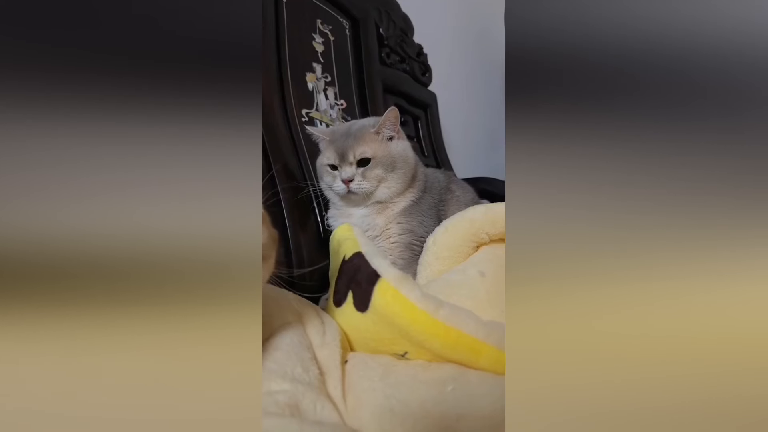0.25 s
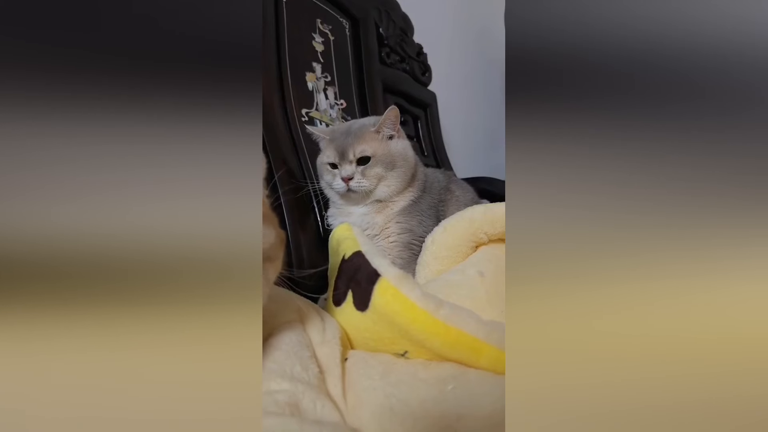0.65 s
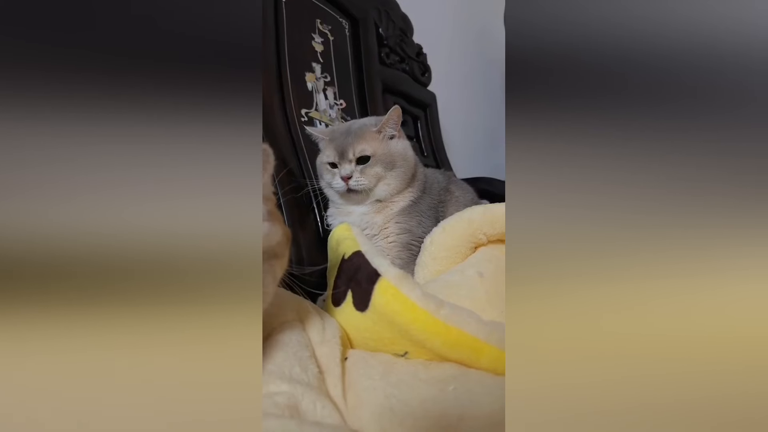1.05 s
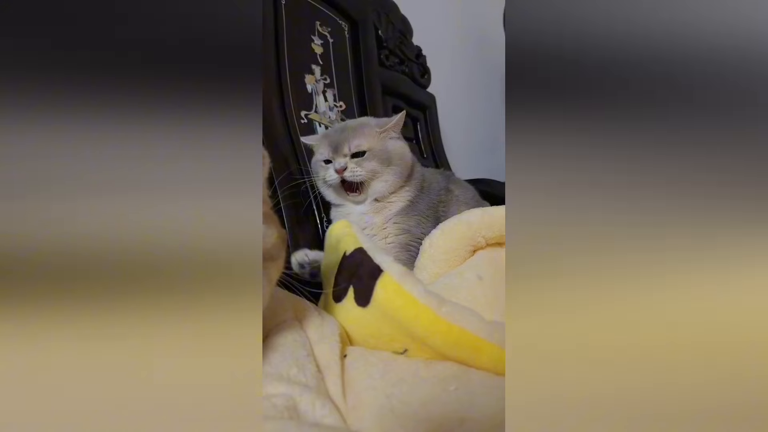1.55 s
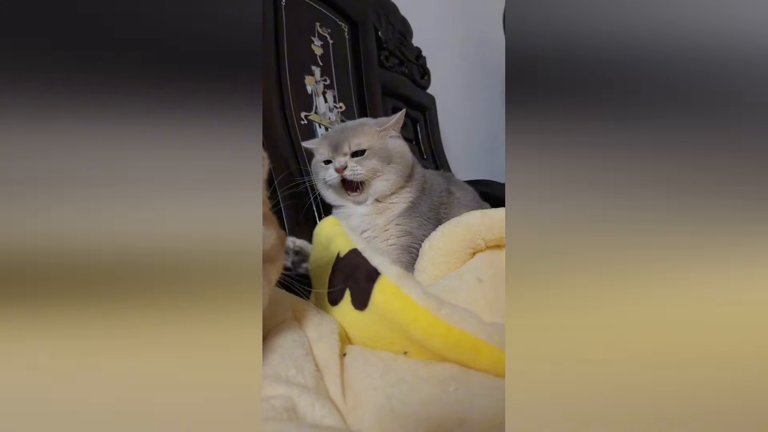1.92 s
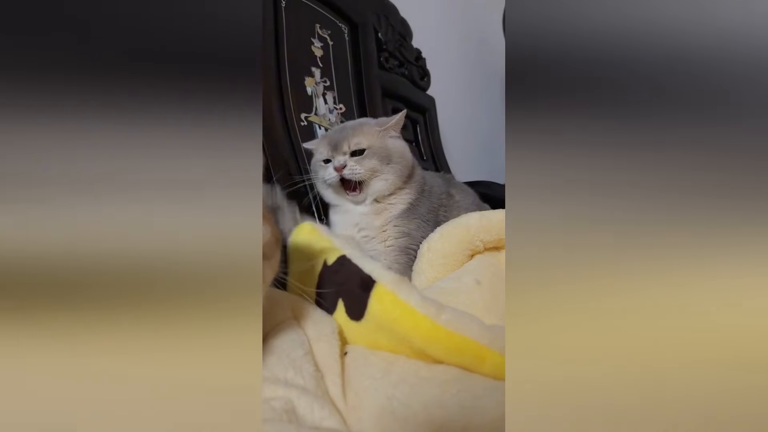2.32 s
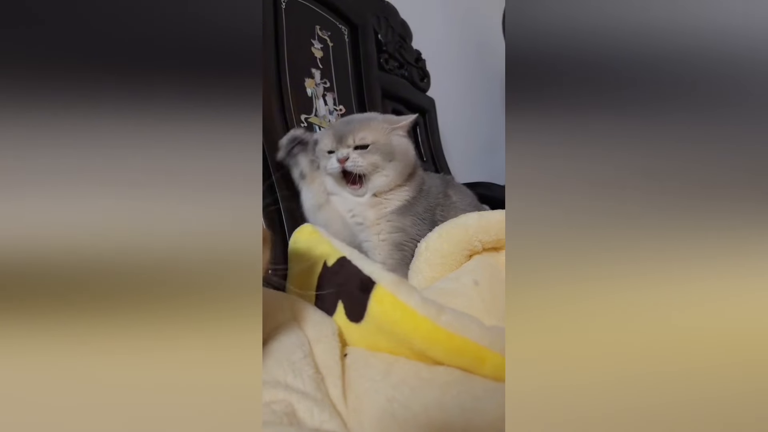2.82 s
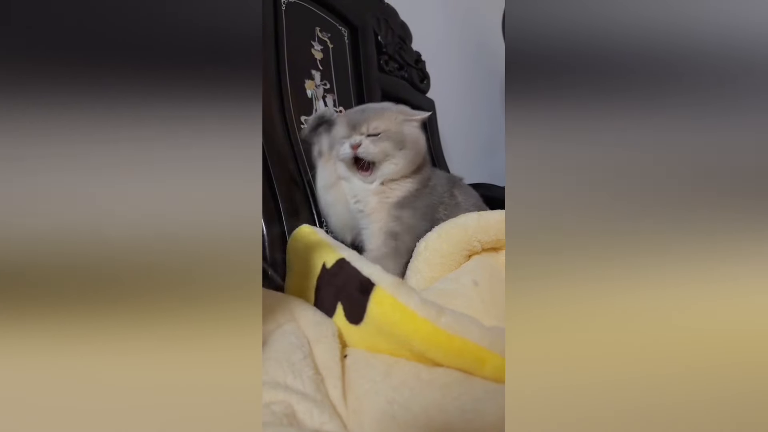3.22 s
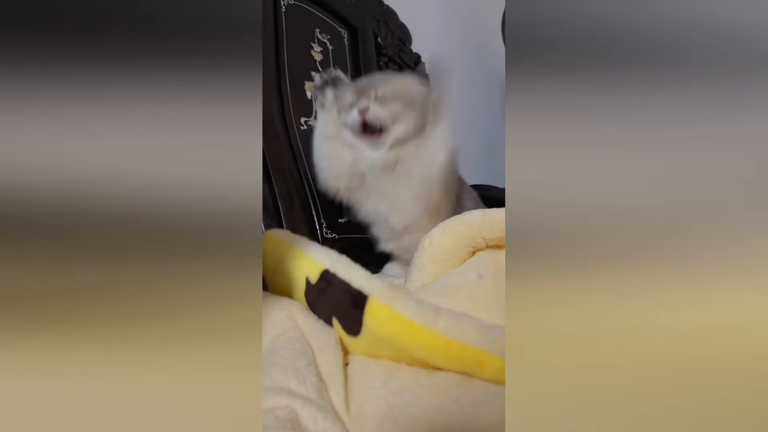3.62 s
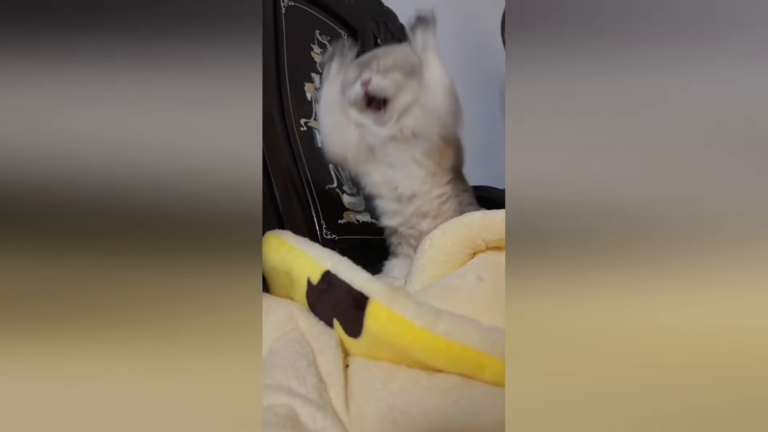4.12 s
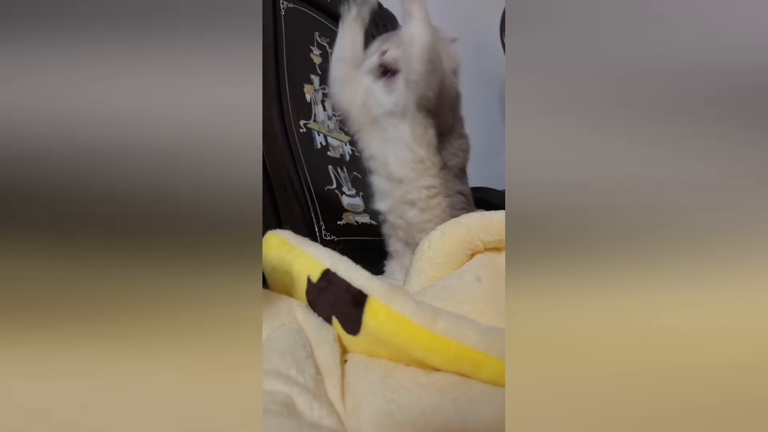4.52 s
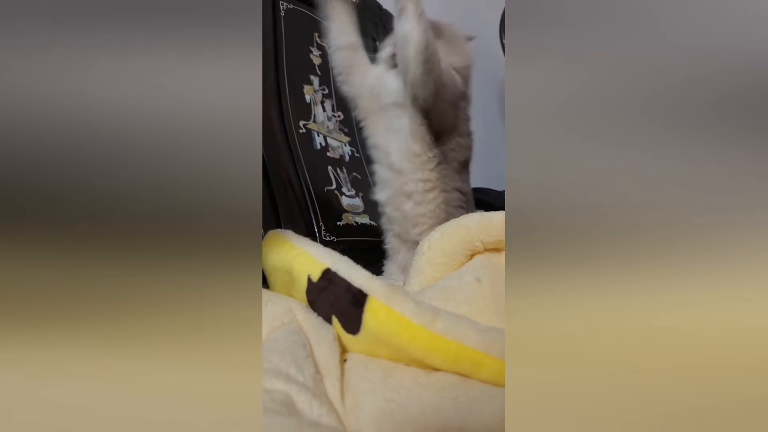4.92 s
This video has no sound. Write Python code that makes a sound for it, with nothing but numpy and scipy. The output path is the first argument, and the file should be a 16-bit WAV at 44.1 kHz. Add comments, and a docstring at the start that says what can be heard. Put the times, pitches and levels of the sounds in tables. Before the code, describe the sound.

A cat moans low, then breaks into one long, rising yowl that turns into a harsh scream, with faint scuffling on a blanket.

```python
"""A cat moans with its mouth closed, sinking in pitch, with a faint whine behind it. The mouth opens and
the pitch leaps, holds and climbs into one long yowl. The vocal folds in the throat make the buzz, and the
nose and mouth shape it. A second, lower vibration of the folds roughens the cry and takes over, while
the cat rears up and scuffles on a blanket. It all happens in a small room, close to a phone."""
import sys
import numpy as np
from scipy import signal
from scipy.fft import rfft, irfft
from scipy.io import wavfile
from scipy.ndimage import uniform_filter1d, minimum_filter1d

SR = 44100
rng = np.random.default_rng(int(sys.argv[2]) if len(sys.argv) > 2 else 0)


def dump(signal):
    """Clip the signal to [-1, 1] and save it as 16-bit WAV at the path in sys.argv[1]."""
    limited = np.clip(np.atleast_2d(signal).T, -1, 1)
    pcm = np.round(limited * 32767).astype(np.int16)
    wavfile.write(sys.argv[1], SR, pcm)


N = 227195
T = np.arange(N) / SR

# main vibration of the vocal folds: t/s, f/Hz
PITCH = [(0.0, 390), (0.025, 369), (0.055, 390.5), (0.13, 376), (0.19, 348.8), (0.27, 332.6),
         (0.305, 340.7), (0.35, 315.5), (0.43, 299.6), (0.47, 315), (0.54, 289), (0.575, 290.4),
         (0.65, 258.4), (0.69, 254.2), (0.78, 242), (0.83, 215.9), (0.9, 238.5), (0.95, 224), (1.03, 252.3),
         (1.062, 310.7), (1.095, 305), (1.13, 329), (1.17, 448), (1.205, 468), (1.24, 482.4), (1.26, 530.2),
         (1.3, 513.2), (1.41, 520), (1.435, 536.5), (1.53, 526.9), (1.62, 517.8), (1.79, 508.7),
         (1.845, 494.7), (1.88, 517.3), (2.1, 522.3), (2.14, 536.5), (2.24, 540.2), (2.41, 560.1),
         (2.5, 575.9), (2.65, 623), (2.8, 666), (2.922, 646), (2.93, 756.4), (3.0, 766.3), (3.09, 764.8),
         (3.14, 786.3), (3.29, 782.5), (3.362, 782), (3.388, 709), (3.41, 763.6), (3.445, 698), (3.53, 682),
         (3.578, 682), (3.586, 764), (3.64, 784.7), (3.85, 793.6), (4.03, 791.2), (4.18, 818), (4.3, 804),
         (4.39, 792), (4.54, 808), (4.7, 817)]
# their second vibration, at half the pitch, then free and sinking:
# t/s, f/Hz, grip on the main one/0-1, level against the main one/dB
LOW_VIBRATION = [(3.6, 408.5, 0.05, -76), (3.75, 403.4, 0.12, -28), (4.02, 395.8, 0.15, -17),
                 (4.06, 542.4, 0.14, -13), (4.3, 538.8, 0.92, -7.5), (4.5, 521.5, 0.08, -21.5),
                 (4.71, 504.3, 0.33, -2.5), (4.82, 487.5, 0.79, 16), (5.15, 475.2, 0.7, 13.5)]
# how fast the pitch trembles: f/Hz, level/dB
TREMOR_RATES = [(5, -6), (25, 0), (70, 1.5), (130, -3), (250, -13), (700, -45), (3000, -79.5)]
# base loudness with the mouth closed: t/s, lowest tone/dB, overtones/dB
MOAN_LEVELS = [(0.0, -36, -34.5), (0.076, -31, -46.5), (0.13, -25.5, -28.5), (0.446, -27, -24.5),
               (0.518, -27, -29), (0.576, -26.5, -22), (0.71, -35, -33.5), (0.926, -27.5, -22.5),
               (1.02, -29.5, -29)]
# how fast the loudness wavers by chance: f/Hz, level/dB
WAVER_RATES = [(2, -26.5), (6, -0.5), (12, -2.5), (45, -13), (120, -27.5), (1000, -91)]
# the voice leans to one side: t/s, left minus right/dB
PAN = [(0, 10), (.12, 0.5), (1.0, 0), (1.3, 0.5), (2.3, 1), (3.6, 1), (3.74, -7), (3.87, 0.5), (5.15, -0.5)]
# strain makes the voice harsh: t/s, pitch jitter/dB, air in the mouth/dB, hiss at the teeth/dB
STRAIN = [(0, -47, -56, -8), (.6, -44, -50, -6), (.95, -41, -46, -4), (1.3, -43, -42, -6),
          (2.2, -43, -40, -4), (2.75, -41.5, -34, -1), (3.05, -46, -38, -5), (3.45, -43, -27, 1),
          (3.7, -49, -23, 2), (3.9, -49, -20, 3), (4.02, -46, -16, 2), (4.15, -40, -16, 1),
          (4.45, -39, -14, 1), (4.58, -35, -10, 1), (4.72, -35, -9, 5), (4.85, -34, -5, 5)]
# tone colour of the nose: f/Hz, level/dB
NOSE_COLOUR = [(700, -53.5), (1100, -32), (1400, -62.5), (1850, -45), (2250, -57.5), (2700, -55.5),
               (3400, -46.5), (3800, -55.5), (4500, -63.5), (9000, -81.5)]
# the jaw moves and the mouth's resonances (pitches it rings at) change strength:
# t/s, opening/0-1, second against first/dB, third against first/dB, treble peak/dB
MOUTH_MOVES = [(0, 0.05, -53, -66, -10), (.55, 0.05, -42.5, -47, 5), (.85, 0.03, -59, -48, 7),
               (1.02, 0.05, -53, -47, 20), (1.045, 0.11, -36, -25, -18), (1.075, 0.32, -25, -10, 19),
               (1.105, 0.64, -9.5, -18, 12), (1.135, 0.65, -8, -6.5, 4), (1.2, 0.45, -1.5, -10, 14),
               (1.33, 0.56, 5, -6, 18), (1.6, 0.56, 7, 8.5, 15.5), (1.95, 0.54, -1, 14, 10.5),
               (2.3, 0.59, 15, 11.5, 18.5), (2.6, 0.57, 10.5, 6, 15), (2.85, 0.58, 24, -7, 20.5),
               (3.05, 1, 19, -11, -7), (3.3, 0.89, 20.5, 19.5, 3), (3.5, 0.8, 5.5, 3.5, 11),
               (3.72, 0.97, 22.5, 16, 0), (3.9, 0.93, 17, 3.5, 6), (4.2, 0.9, 6.5, -1.5, 11),
               (4.38, 0.96, 1.5, -4.5, -2), (4.55, 0.87, -9, -24, 2), (4.87, 0.78, -23, -23.5, 23),
               (5.15, 0.77, -23, -15, 21)]
# where those resonances lie: opening/0-1, first/Hz, second/Hz, third/Hz, treble peak/Hz
MOUTH_SHAPES = [(0, 510, 1720, 2300, 5970), (.5, 1044, 1773, 2352, 3830), (.62, 1090, 2204, 2550, 5310),
                (.8, 1410, 2100, 2830, 5250), (1, 1543, 2258, 3360, 5890)]
# how fast the head and mouth sway: f/Hz, level/dB
SWAY_RATES = [(1, -10), (5, 0), (14, -3), (40, -25), (300, -80)]
# rough spots where the voice changes register (its way of vibrating):
# t/s, half length/s, jitter/0-1, air/0-1
BREAKS = [(.86, .08, .15, .2), (1.148, .018, .4, .55), (1.86, .05, .22, .25), (2.918, .035, .22, .3),
          (3.41, .035, .42, .25), (3.49, .05, .3, .15), (3.585, .035, .42, .3)]
# two notes of the whine: t/s, length/s, first f/Hz, middle f/Hz, last f/Hz, level/dB
WHINES = [(0, .36, 542.6, 514.5, 508, -53), (0.421, .27, 398, 428, 423.6, -54)]
# its nasal colour: f/Hz, level/dB
WHINE_COLOUR = [(800, -7.5), (1250, 5), (1550, 1.5), (2100, -8.5), (2600, -14), (3100, -16), (4200, -29),
                (9000, -41)]
# colour of the quiet room: f/Hz, level/dB
HUSH_COLOUR = [(20, -7.5), (50, -11), (95, 0.5), (150, -13), (400, -13.5), (1200, -29), (2500, -33.5),
               (4500, -38), (10500, -39), (12000, -53.5), (16000, -64)]
# base loudness of the lowest tone with the mouth open: t/s, level/dB
CHEST_LEVEL = [(1.06, -29.5), (1.24, -36.5), (1.63, -33.5), (1.81, -42), (3.14, -37), (3.3, -31),
               (3.52, -49), (3.59, -40), (3.91, -31), (4.51, -45), (4.66, -33.5), (4.84, -50.5),
               (5.1, -39.5), (5.15, -48)]
# base loudness of the overtones with the mouth open: t/s, level/dB
CRY_LEVEL = [(1.06, -24.5), (1.1, -23.5), (1.24, -25.5), (1.33, -20.5), (1.7, -16), (1.99, -20.5),
             (2.2, -19), (2.43, -15.5), (2.8, -18), (2.88, -14.5), (3.1, -19.5), (3.3, -17), (3.52, -21),
             (3.85, -19), (4.2, -21), (4.55, -21), (4.77, -23), (5.15, -21.5)]
# base loudness of the treble, which leaps as the lips part: t/s, level/dB
TREBLE_LEVEL = [(0, -77.5), (1.025, -72.5), (1.037, -51.5), (1.22, -46.5), (1.31, -42.5), (1.4, -48),
                (1.68, -41.5), (2.25, -45), (2.84, -37), (3.12, -43), (3.39, -43), (3.58, -41.5),
                (3.78, -36), (4.05, -39.5), (4.5, -45), (4.64, -44), (4.93, -37), (5.15, -38)]
# colour of the treble: f/Hz, level/dB
TREBLE_COLOUR = [(3000, 18.5), (3500, 8.5), (3950, 9.5), (4900, 1), (6200, 3.5), (6650, -23), (7100, -7.5),
                 (7900, -8), (8250, -11), (8650, 5), (10200, -5.5), (11400, -7.5), (12500, -14),
                 (15500, -17.5)]
# the folds close a little early or late, blurring the treble: t/s, timing spread/ms
HOARSENESS = [(0, .005), (1.2, .009), (2.85, .012), (3.02, .004), (3.3, .004), (3.42, .02), (3.65, .006),
              (4.0, .008), (4.3, .018), (5.15, .03)]
# how fast that timing changes: f/Hz, level/dB
SCATTER_RATES = [(20, -6), (150, 0), (350, -3), (900, -30), (3000, -70)]
# the loudness heard in the room briefly swells or dips: t/s, half length/s, gain/dB
LEVEL_BUMPS = [(1.286, 0.0035, 15), (1.312, 0.0086, 5.5), (1.397, 0.017, 6), (1.425, 0.01, -3.5),
               (1.455, 0.023, 3), (1.513, .012, -4), (2.125, 0.018, 3.5), (2.255, 0.014, 1.5),
               (2.785, 0.014, -5), (2.838, 0.0094, -2), (3.04, 0.022, 4), (3.09, 0.013, -1.5),
               (3.128, 0.011, 16), (3.27, .04, 1), (3.369, 0.008, 6), (3.77, 0.012, 3), (4.03, 0.016, -4),
               (4.47, 0.064, 4.5), (4.675, 0.022, 6.5), (4.855, 0.065, 5), (4.935, 0.0075, -4)]
# the level dips briefly: t/s, half length/s, gain/dB
DIPS = [(1.29, 0.0039, -17.5), (3.396, 0.011, -13.5), (3.798, 0.0037, -17)]
# paws thud on the cushion: t/s, length/s, f/Hz, level/dB
THUDS = [(1.41, 0.029, 89.5, -51.5), (2.08, 0.071, 55, -36.5), (2.301, 0.31, 78, -54),
         (2.8, 0.22, 88.4, -56.5), (3.299, 0.27, 62, -44.5), (3.648, 0.22, 61.6, -52), (4.3, 0.18, 85, -51),
         (4.952, 0.18, 92.06, -44)]
# colour of a thud: multiple of its pitch, level/dB
THUD_COLOUR = [(.25, -20), (.95, -3), (1.13, 0), (2, -22), (6, -55), (30, -93)]
# brief patches of thin, very high sizzle: t/s, length/s, brightest f/Hz, level/dB
SIZZLES = [(1.44, 0.04, 14360, -57), (2.329, 0.14, 14050, -59), (2.556, 0.082, 9780, -50),
           (3.8, 0.28, 15000, -55), (4.103, 0.24, 9200, -56), (4.534, 0.13, 10300, -51.5),
           (4.67, 0.15, 10300, -47), (4.681, 0.25, 14800, -52), (4.915, 0.2, 10360, -44.5),
           (4.97, .14, 12450, -52)]
# colour of a sizzle: multiple of its brightest pitch, level/dB
SIZZLE_COLOUR = [(.3, -36), (.7, -20), (.85, -11), (.94, -3), (1, 0), (1.06, -3), (1.17, -15), (1.6, -30)]
# the folds flutter in spells: t/s, half length/s, swing/share of the pitch
FLUTTERS = [(1.55, 0.11, .008), (1.86, .09, 0.009), (2.33, 0.1, 0.016), (2.68, 0.12, 0.011)]
# the body rubs the blanket: t/s, length/s, level/dB
RUBS = [(2.01, 0.16, -55.5), (2.55, 0.45, -61.5), (3.75, 0.091, -47), (4.1, 0.15, -45.5),
        (4.32, 0.14, -36.5), (4.71, 0.14, -39.5), (4.9, 0.27, -47.5)]
# a piercing edge on the scream: t/s, f/Hz, level/dB
EDGE = [(2.7, 6940, -71), (2.97, 6980, -60), (3.45, 7500, -62), (3.68, 7250, -40), (3.85, 7500, -44.5),
        (4.08, 7450, -57), (4.2, 7797, -47.5), (4.36, 7254, -52), (4.55, 7136, -60), (4.8, 7184, -60)]
# the folds flip between two registers: t/s, half length/s, typical lead or lag of the pitch/s
CRACKS = [(2.926, .04, .022), (3.582, .045, .03)]
# how fast they flip: f/Hz, level/dB
FLIP_RATES = [(10, -14), (60, 0), (130, -2), (300, -25), (1500, -70)]
# air whistles in the throat: t/s, f/Hz, width/Hz, level/dB
WHISTLE = [(2.9, 5230, 501, -120), (3.2, 5100, 499, -54.5), (3.37, 5440, 451.4, -39),
           (3.46, 5420, 449, -37), (3.6, 5700, 600, -52), (3.82, 5970, 548.6, -44),
           (4.05, 5980, 446.8, -41.5), (4.25, 5750, 350, -40.5), (4.33, 5636, 230, -38),
           (4.48, 5510, 180, -33.5), (4.59, 5603, 200, -38), (4.67, 5370, 400, -62),
           (4.8, 5317, 403.5, -81)]

FIRST_WIDTH_SHARE, FIRST_WIDEST_HZ, SECOND_WIDTH_HZ, THIRD_WIDTH_HZ = 0.45, 426, 630, 364
SWAY_DB, NOSE_FADE_OPENING = 2.5, .075
BREAK_JITTER_DB, BREAK_AIR_DB, BREAK_HISS_DB = 16, 27, 4
LIPS_PART_S, LIPS_TIME_S = 1.02, 0.027
LOW_TONE_DB, LOW_JITTER_DB = 2.5, 3  # extra for the second vibration
TONE_LEFT_DB, WAVER_DB = 6, 1.1
PATCH_DB, PATCH_SPACING_HZ, PATCH_DRIFT_RAD = 4, 1250, 1.5
HIGH_HISS_DB, HIGH_HISS_GROWTH = -38.5, 0.64  # base level, dB gained per dB of treble
REBOUND_AFTER_S, REBOUND_HALF_S, REBOUND_DB = 0.025, 0.019, 3.5  # a short rise after each dip
FLUTTER_HZ, FLUTTER_DB_PER_SWING = 56, 230
EDGE_WIDTH_HZ, EDGE_AIR_DB = 800, -6  # the edge holds less air than the other treble
ATTACK_S, RELEASE_S, SIZZLE_GRAIN_DB = 0.041, 0.055, 3
ROOM_T60_S, ROOM_DB, ROOM_BASS_HZ = 0.24, 5, 452  # T60: time to fade by 60 dB
LIMIT_DB, LIMIT_S, TOP_HZ = -4, .004, 15800


def amp(db):
    """Turns decibels into a gain."""
    return 10 ** (np.asarray(db) / 20)


def curves(table, t=T):
    """The columns of a table, joined by straight lines along the first (usually time)."""
    s, *columns = np.transpose(table)
    return [np.interp(t, s, c) for c in columns]


def bumps(rows):
    """Sum of bell curves, one for each row of t/s, half length/s, height."""
    return sum(height * np.exp(-((T - s) / half) ** 2) for s, half, height in rows)


def swells(rows):
    """Gain that rises, holds and dies away for each row of t/s, length/s, level/dB."""
    return sum(amp(db) * np.exp(np.minimum(T - s, 0) / ATTACK_S - np.maximum(T - s - length, 0) / RELEASE_S)
               for s, length, db in rows)


def colour(points, hz):
    """Gain at hz of a tone colour given as f/Hz, level/dB."""
    f, db = np.transpose(points)
    return amp(np.interp(np.log(hz + 1), np.log(f), db))


def resonance(hz, centre_hz, width_hz):
    """Gain of a steep peak that favours one pitch."""
    return 1 / (1 + (2 * (hz - centre_hz) / width_hz) ** 2 / 2) ** 2


def moving_filter(x, gain, size=512):
    """Filters x by gain(hz, t), one short slice at a time."""
    slicing = dict(fs=SR, nperseg=size, noverlap=size - size // 4)
    hz, t, slices = signal.stft(x, **slicing)
    return signal.istft(slices * gain(hz[:, None], t), **slicing)[1][..., :N]


def noise(points):
    """Noise of a given colour, with a typical size of 1."""
    x = irfft(rfft(rng.standard_normal(N)) * colour(points, np.fft.rfftfreq(N, 1 / SR)), N)
    return x / x.std()


def wide_noise(points, side_db):
    """Stereo noise of a given colour; side_db sets how much the sides differ."""
    side = amp(side_db) * noise(points)
    return noise(points) + np.array([side, -side])


def lean(db):
    """Left and right gains that lie db apart."""
    return amp(np.array([db, -db]) / 2)


def room_response():
    """Direct sound, then dense echoes whose bass is alike at both microphones."""
    t = T[:SR // 2]
    mid, side = rng.standard_normal((2, len(t))) * amp(-60 * t / ROOM_T60_S) * (t > .002)
    side = signal.sosfilt(signal.butter(2, ROOM_BASS_HZ, "high", fs=SR, output="sos"), side) * amp(-4.0)
    response = np.array([mid + side, mid - side]) * amp(ROOM_DB) / np.sqrt(2 * np.sum(mid ** 2))
    response[:, 0] += 1
    return response


def in_room(x, room, db, size=2205):
    """Lets a sound ring in the room, then brings it to the level db, keeping its fast flutter."""
    stereo = signal.fftconvolve(x[None], room, axes=1)[:, :N]
    power = .8 * stereo.mean(axis=0) ** 2 + .2 * (stereo ** 2).mean(axis=0)
    slow_power = uniform_filter1d(uniform_filter1d(power, size), size)
    return stereo * amp(db) / np.sqrt(np.abs(slow_power) + 1e-14)


def cat(room):
    """The voice: buzz and breath pass through nose, mouth and teeth, first as a moan, then as a cry."""
    tone, low_tone, overtones, hoarse, air = folds()
    opened = np.clip((T - LIPS_PART_S) / LIPS_TIME_S, 0, 1)
    open_levels = np.array(curves(CHEST_LEVEL) + curves(CRY_LEVEL))
    tone_db, cry_db = (1 - opened) * np.array(curves(MOAN_LEVELS)) + opened * open_levels
    treble_db, = curves(TREBLE_LEVEL)
    _, air_db, hiss_db = harshness()
    cry = moving_filter(overtones + amp(air_db) * air, mouth)

    rebounds = [(s + REBOUND_AFTER_S, REBOUND_HALF_S, REBOUND_DB) for s, _, _ in DIPS]
    dip_db = bumps(DIPS) + bumps(rebounds)
    swing_db = bumps(LEVEL_BUMPS) + dip_db + FLUTTER_DB_PER_SWING * flutter()
    swing_db += WAVER_DB * noise(WAVER_RATES)

    # the lowest tone passes to the second vibration once that one is the stronger
    *_, low_db = curves(LOW_VIBRATION)
    main_share_db = -10 * np.log10(1 + amp(low_db) ** 2)
    low_share_db = 2 * (main_share_db + low_db) + LOW_TONE_DB
    chest = (in_room(tone, room, tone_db + main_share_db + 0.72 * dip_db)
             + in_room(low_tone, room, tone_db + low_share_db))

    rasp = moving_filter(hoarse + amp(hiss_db) * air, teeth)
    shriek = moving_filter(hoarse + amp(hiss_db + EDGE_AIR_DB) * air, edge)
    upper = (in_room(cry, room, cry_db + swing_db - .8)
             + in_room(rasp, room, treble_db + .5 * swing_db - .4)
             + in_room(shriek, room, curves(EDGE)[-1])
             + in_room(whistle(), room, curves(WHISTLE)[-1])
             + high_hiss(treble_db + swing_db))
    pan_db, = curves(PAN)
    return chest * lean((1 - opened) * pan_db + opened * TONE_LEFT_DB) + upper * lean(pan_db)


def folds():
    """The folds vibrate in two ways: gives main tone, low tone, overtones, hoarse overtones and air."""
    hz, = curves(PITCH, T + bumps(CRACKS) * noise(FLIP_RATES))
    low_hz, _, _ = curves(LOW_VIBRATION)
    jitter_db, _, _ = harshness()
    phase = vibration(hz * (1 + flutter()), jitter_db)
    low_phase = vibration(low_hz, jitter_db + LOW_JITTER_DB)
    spread_ms, = curves(HOARSENESS)
    slip = 2 * np.pi * hz * spread_ms / 1000 * noise(SCATTER_RATES)
    air = noise([(300, -8.5), (1100, -9.0), (1900, 13.0), (6200, -17.5), (7200, -24.5), (16000, -23)])
    air *= 1 + 0.097 * np.cos(phase)  # one puff each cycle
    overtones, hoarse = closures(phase, low_phase), closures(phase + slip, low_phase)
    return np.cos(phase), np.cos(low_phase), overtones, hoarse, air


def vibration(hz, jitter_db):
    """Phase (progress through its cycles) of a fold whose pitch trembles."""
    return 2 * np.pi * np.cumsum(hz * (1 + amp(jitter_db) * noise(TREMOR_RATES))) / SR


def pulses(phase, hz, shift=0, count=44):
    """A buzz of equally strong harmonics; a running shift moves them all by the same frequency."""
    return sum(np.cos(k * phase + shift) * (k * hz < SR * .4) for k in range(1, count))


def closures(phase, low_phase):
    """The folds snap shut again and again, making the overtones of both vibrations."""
    hz, = curves(PITCH)
    low_hz, grip, low_db = curves(LOW_VIBRATION)
    # the lower vibration throttles the main one, adding tones between the harmonics
    above = pulses(phase, hz, low_phase, count=12)
    below = pulses(phase, hz, -low_phase, count=12)
    main = pulses(phase, hz, count=32) - np.cos(phase) + grip * (above + amp(-6.5) * below)
    low = pulses(low_phase, low_hz, count=24) - np.cos(low_phase)
    return (main + amp(low_db) * low) / np.sqrt(1 + amp(low_db) ** 2)


def harshness():
    """Strain and register breaks roughen the voice: gives jitter/dB, air/dB, hiss/dB."""
    jitter_db, air_db, hiss_db = curves(STRAIN)
    shaky = bumps([(s, half, jitter) for s, half, jitter, _ in BREAKS])
    airy = bumps([(s, half, air) for s, half, _, air in BREAKS])
    return (jitter_db + BREAK_JITTER_DB * shaky,
            air_db + BREAK_AIR_DB * airy,
            hiss_db + BREAK_HISS_DB * airy)


def mouth(hz, t):
    """Three resonances rise as the jaw opens; the nose sounds while it is nearly shut."""
    jaw, second_db, third_db, _ = curves(MOUTH_MOVES, t)
    first, second, third, _ = curves(MOUTH_SHAPES, jaw)
    return (resonance(hz, first, np.minimum(FIRST_WIDTH_SHARE * first, FIRST_WIDEST_HZ))
            + amp(second_db + SWAY_DB * sway(t)) * resonance(hz, second, SECOND_WIDTH_HZ)
            + amp(third_db + SWAY_DB * sway(t)) * resonance(hz, third, THIRD_WIDTH_HZ)
            + np.exp(-(jaw / NOSE_FADE_OPENING) ** 2) * colour(NOSE_COLOUR, hz))


def sway(t):
    """Slow chance movement of the head and mouth."""
    return np.interp(t, T, noise(SWAY_RATES))


def whine(room):
    """A thin, faint whine behind the moan, probably a second cat."""
    out = 0
    for s, length, first, middle, last, db in WHINES:
        hz, = curves([(s - length / 2, 2 * first - middle), (s + length / 2, middle), (s + length, last)])
        buzz = pulses(vibration(hz, jitter_db=-46.0), hz, count=9)
        tone = moving_filter(buzz, lambda f, t: colour(WHINE_COLOUR, f))
        out = out + in_room(tone, room, db=0) * swells([(s, length, db)])
    return out


def hush():
    """Quiet room noise that sinks as the cry gets going."""
    level_db = np.interp(T, [1.15, 1.35], [-51.5, -62.5])
    return wide_noise(HUSH_COLOUR, side_db=-12.5) * amp(level_db)


def teeth(hz, t):
    """The thin, patchy treble of the open mouth, with one peak that glides with the jaw."""
    jaw, _, _, peak_db = curves(MOUTH_MOVES, t)
    *_, peak_hz = curves(MOUTH_SHAPES, jaw)
    patches = amp(PATCH_DB * np.cos(2 * np.pi * hz / PATCH_SPACING_HZ + PATCH_DRIFT_RAD * sway(t)))
    peak = 1 + amp(peak_db) * resonance(hz, peak_hz, width_hz=856)
    return colour(TREBLE_COLOUR, hz) * (hz > 2800) * patches * peak


def high_hiss(treble_db):
    """A fine, very high hiss that follows the treble's level."""
    hiss = wide_noise([(3000, -48.5), (11500, -18.0), (13500, -8.5), (15500, -4.0), (18000, -25.5)],
                      side_db=-17.5)
    return hiss * amp(HIGH_HISS_DB + HIGH_HISS_GROWTH * treble_db + 3.1 * noise(WAVER_RATES))


def thud(s, length, hz, db):
    """A paw gives the cushion a soft, low push."""
    rumble = wide_noise([(hz * k, level) for k, level in THUD_COLOUR], side_db=-9.0)
    return rumble * swells([(s, length, db)])


def sizzle(s, length, hz, db):
    """A brief patch of thin, grainy, very high sizzle."""
    hiss = wide_noise([(hz * k, level) for k, level in SIZZLE_COLOUR], side_db=-6.5)
    grain = amp(SIZZLE_GRAIN_DB * noise([(20, 1.5), (300, -6), (3000, -37.5)]))
    return hiss * grain / np.sqrt(np.mean(grain ** 2)) * swells([(s, length, db)])


def flutter():
    """A quick, regular swing of the folds' pitch and loudness that comes and goes."""
    return bumps(FLUTTERS) * np.sin(2 * np.pi * FLUTTER_HZ * T)


def rubs():
    """The body rubs the blanket with a dull rustle."""
    rustle = wide_noise([(60, -17), (110, -6.5), (155, 9.5), (240, -2.5), (400, -8.5), (700, -14.0),
                         (3000, -34.5), (9000, -77.0)], side_db=-3.5)
    return rustle * swells(RUBS)


def edge(hz, t):
    """A high resonance picks out a few harmonics of the scream."""
    return resonance(hz, curves(EDGE, t)[0], EDGE_WIDTH_HZ)


def whistle():
    """Rushing air in a high resonance of the throat narrows to a whistle."""
    return moving_filter(rng.standard_normal(N), lambda hz, t: resonance(hz, *curves(WHISTLE, t)[:2]))


def scene():
    """The yowl, the faint whine, the scuffle and patches of sizzle in a quiet room."""
    room = room_response()
    voices = cat(room) + whine(room)
    scuffle = rubs() + sum(thud(*row) for row in THUDS)
    return voices + scuffle + sum(sizzle(*row) for row in SIZZLES) + hush()


def record(dry):
    """The phone holds down the loudest peaks and cuts the highest treble."""
    size = int(LIMIT_S * SR)
    gain = np.minimum(1, amp(LIMIT_DB) / (np.abs(dry).max(axis=0) + 1e-9))
    gain = uniform_filter1d(minimum_filter1d(gain, 2 * size), size)
    return signal.sosfilt(signal.ellip(10, .2, 80, TOP_HZ, fs=SR, output="sos"), dry * gain)


dry = scene()
out = record(dry)
dump(out)
```